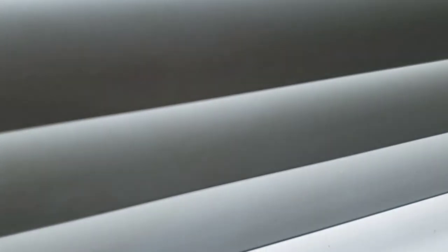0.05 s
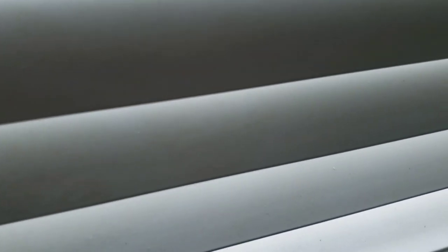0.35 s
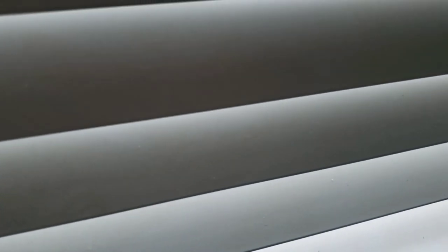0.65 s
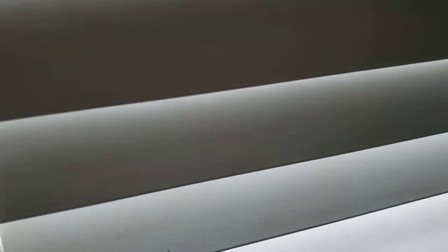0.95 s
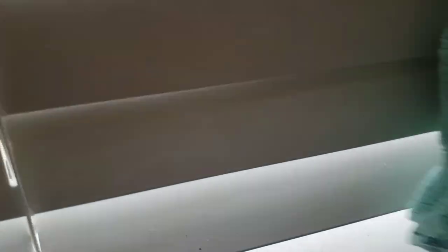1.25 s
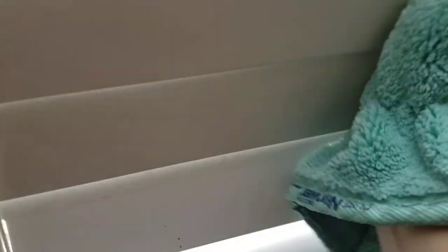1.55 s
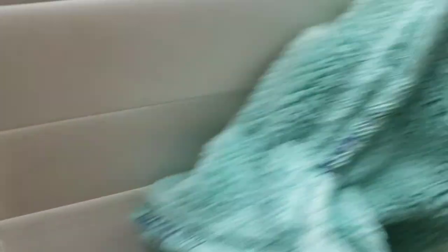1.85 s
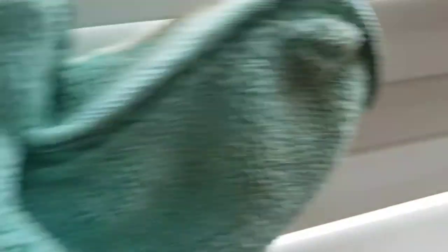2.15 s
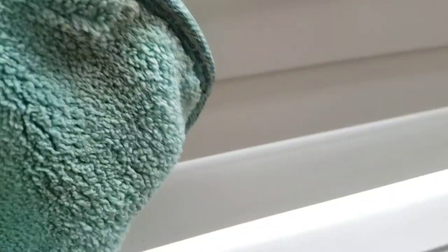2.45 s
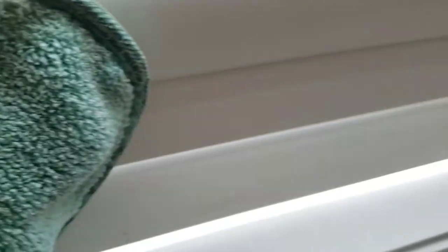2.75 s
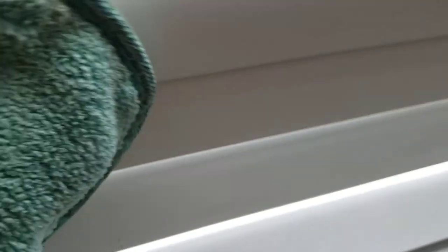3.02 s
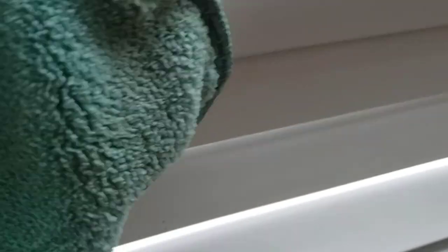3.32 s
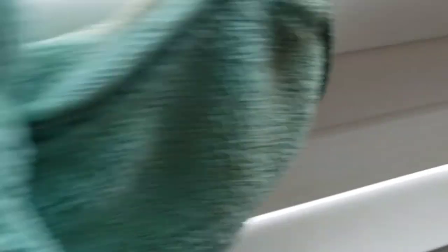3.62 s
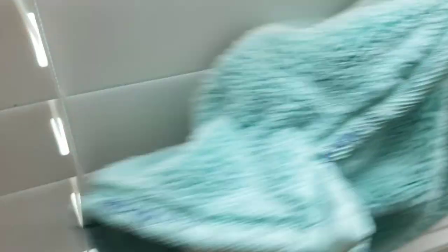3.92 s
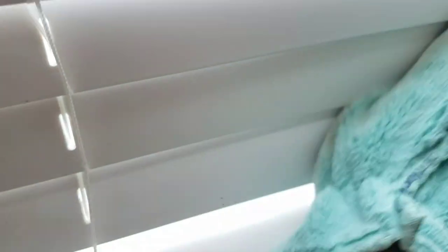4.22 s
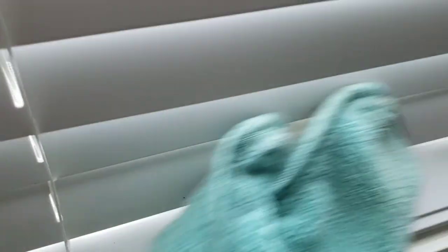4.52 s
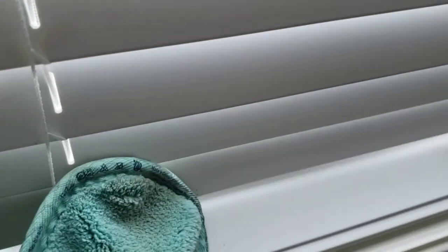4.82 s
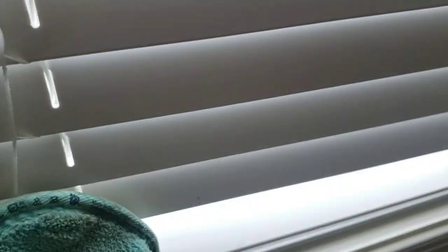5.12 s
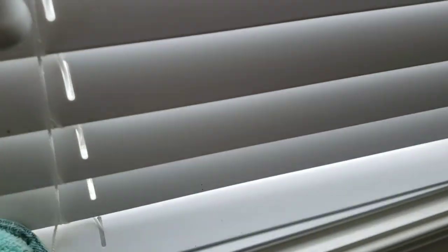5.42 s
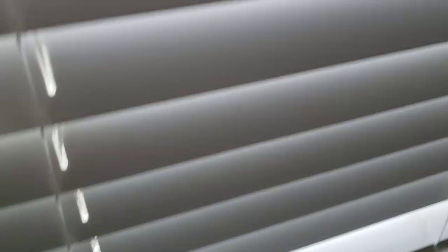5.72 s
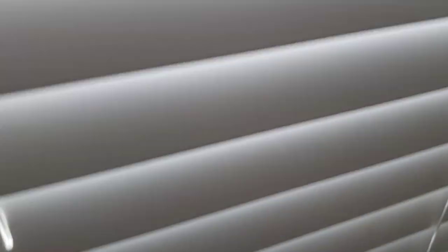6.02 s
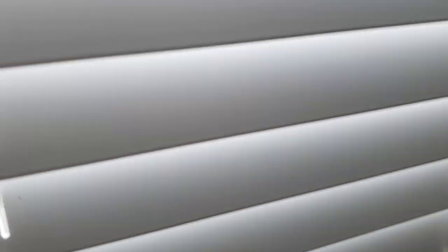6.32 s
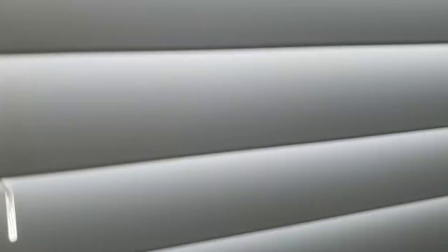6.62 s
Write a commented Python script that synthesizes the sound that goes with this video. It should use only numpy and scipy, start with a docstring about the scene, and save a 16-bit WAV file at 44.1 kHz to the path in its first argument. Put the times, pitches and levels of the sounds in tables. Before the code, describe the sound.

A cloth mitt swishes along window blinds close by, with dull knocks and sharp clacks as the slats bump together.

```python
"""A faint hiss and a low handling rumble, then a microfiber mitt swishes to and fro along window blinds.
Its pile slides and catches on the slats, which rasp, sing and shudder. The hand bumps the blind with
dull knocks; slat edges clack and tick against each other in a small room. The hand-held camera close
by adds two soft pops early on and a fingertip tap at the end."""
import sys
import numpy as np
from scipy import signal
from scipy.fft import rfft, irfft, next_fast_len
from scipy.io import wavfile
from scipy.ndimage import uniform_filter1d

SR = 44100
rng = np.random.default_rng(int(sys.argv[2]) if len(sys.argv) > 2 else 0)


def to_wav(s):
    """Save 16-bit WAV."""
    ch = np.atleast_2d(s).T  # columns
    pcm = np.round(np.clip(ch, -1, 1) * 32767)  # PCM
    wavfile.write(sys.argv[1], SR, pcm.astype(np.int16))


N = 298557
RIGHT_LAG_S = .0003  # between the two microphone ports


def amp(db):
    """Decibels to gain."""
    return 10 ** (np.asarray(db) / 20)


def unit(x):
    """Scales to rms 1."""
    return x / np.sqrt(np.mean(x ** 2) + 1e-20)


def read(points, hz):
    """Interpolates a curve over log frequency."""
    freq_hz, value = np.transpose(points)
    return np.interp(np.log(hz + 1), np.log(freq_hz + 1), value)


def sides(db):
    """Left and right gains for a level difference."""
    half_db = np.atleast_1d(db) / 2
    pair = np.array([amp(half_db), amp(-half_db)])
    return pair / np.sqrt(np.mean(pair ** 2, axis=0))


def add(mix, start_s, sound):
    """Mixes a sound in at start_s."""
    part = mix[:, max(round(start_s * SR), 0):][:, :sound.shape[1]]
    part += sound[:, :part.shape[1]]


def fft_grid():
    """Bin frequencies and size of an FFT that holds the whole scene."""
    size = 2 * next_fast_len(N // 2 + 1, True)
    return np.fft.rfftfreq(size, 1 / SR), size


def wander(rate_hz):
    """Smooth random drift, rms 1."""
    hz, size = fft_grid()
    return unit(irfft(rfft(rng.standard_normal(size)) / (1 + (hz / rate_hz) ** 4))[:N])


def resonance(hz, width_hz, count):
    """Stereo noise in one narrow resonance, rms 1."""
    offset = (np.fft.rfftfreq(count, 1 / SR) - hz) / width_hz
    return unit(irfft(rfft(rng.standard_normal((2, count))) / (1 + offset ** 2), count))


def swell(length_s):
    """One smooth rise and fall."""
    return signal.windows.hann(round(max(length_s, .005) * SR))[None]


def swells(rows):
    """Gain over time for a table of swells."""
    gain = np.zeros((1, N))
    for centre_s, length_s, level_db in rows:
        add(gain, centre_s - length_s / 2, amp(level_db) * swell(length_s))
    return gain


# Likeness of the ports: freq_hz, coherence
PORT_COHERENCE = [(60, 0.8), (160, 0.97), (350, 0.97), (640, 0.346), (1400, 0.36), (3000, 0.13),
                  (15000, 0.033)]
def ports(a, b, hz):
    """Two unrelated spectra become a partly alike pair, the right one late."""
    same = np.clip(read(PORT_COHERENCE, hz), -1, 1)
    delay = np.exp(-2j * np.pi * hz * RIGHT_LAG_S)
    return np.array([a, same * a * delay + np.sqrt(1 - same ** 2) * b])


# Balance of the ports: freq_hz, left_minus_right_db
PORT_BALANCE = [(100, 5), (400, 3), (800, 3.5), (1300, 5), (2400, 8.5), (4400, 13.5), (8000, 5.5),
                (12000, -5), (15000, -3)]
def colour(drive, spectrum):
    """Gives a noise pair a spectrum and the ports' stereo image; its mid has rms 1."""
    hz, size = fft_grid()
    shaped = ports(*rfft(drive, size), hz) * amp(read(spectrum, hz))
    pair = irfft(shaped * sides(read(PORT_BALANCE, hz)))[:, :N]
    return pair / np.std(pair.mean(axis=0))


# Room tone: freq_hz, density_db
AIR_SPECTRUM = [(25, -0.5), (95, -5), (170, -9.5), (260, -11.5), (470, -16), (650, -24), (1350, -28),
                (1750, -15), (2050, -8), (2600, -27.5), (3400, -18.5), (4500, -30), (6500, -42.5),
                (8700, -48), (12000, -30), (16000, -31.5)]
def still_air():
    """The steady noise floor of the room."""
    return amp(-72) * colour(rng.standard_normal((2, N)), AIR_SPECTRUM)


# Left port hiss: freq_hz, density_db
HISS_SPECTRUM = [(300, 1), (600, 4), (1100, 4), (1900, -2), (3000, -3), (5000, -4.5), (7000, -16),
                 (8700, -26), (10500, -7), (12500, -1.5), (16000, -2.5)]
def left_hiss(level_db=-66.5, fade_s=.018):
    """A thin hiss on the left, dying away at the first pop."""
    hz, size = fft_grid()
    hiss = unit(irfft(rfft(rng.standard_normal(size)) * amp(read(HISS_SPECTRUM, hz)))[:N])
    since_pop_s = np.maximum(np.arange(N) / SR - PORT_POPS[0][0], 0)
    hiss *= amp(level_db) * np.exp(-since_pop_s / fade_s)
    return np.array([hiss, np.zeros(N)])


# Handling noise: freq_hz, density_db
RUMBLE_SPECTRUM = [(20, -13.5), (40, -0.5), (60, 7), (100, 1), (150, -2), (250, -20), (600, -58.5)]
# Shifts of grip: centre_s, length_s, level_db
GRIP_SHIFTS = [(.87, 0.23, -54.5), (1.35, 0.18, -51.5), (2.33, 0.44, -53.5), (5.53, 0.38, -56.5)]
def grip_rumble(shake_db):
    """The hand on the camera rumbles, more with the work and with each shift of grip."""
    rumble = colour(rng.standard_normal((2, N)), RUMBLE_SPECTRUM)
    holding = amp(-52 + .15 * shake_db + 2 * wander(rate_hz=8.2))
    return rumble * np.hypot(holding, swells(GRIP_SHIFTS))


# Finger on the port: start_s, level_db
PORT_POPS = [(0.5377, -32), (0.572, -42.5)]
# Camera case modes: freq_hz, level_db, t60_s
CASE_MODES = [(2220, -43.5, 0.042), (12980, -40, 0.029)]
def finger_touches(pop_decay_s=.005, pop_cut_hz=2200, tap_s=6.7094):
    """A finger closes the left port with dull pops; later a tap rings the case."""
    out = np.zeros((2, N))
    t = np.arange(SR // 20) / SR
    pulse = (t / pop_decay_s - 1) * np.exp(-t / pop_decay_s)
    pop = signal.lfilter(*signal.butter(1, pop_cut_hz, fs=SR), pulse)
    for start_s, level_db in PORT_POPS:
        add(out[:1], start_s, amp(level_db) * pop[None])
    for hz, level_db, t60_s in CASE_MODES:
        ring = amp(level_db - 60 * t / t60_s) * resonance(hz, .067 * hz, len(t))
        add(out, tap_s, ring * sides(read(PORT_BALANCE, hz)))
    return out


# Reverberation: freq_hz, t60_s
ROOM_DECAY = [(150, 0.44), (400, 0.3), (1000, 0.57), (3000, 0.16), (12000, 0.35)]
def room(x, echoes_per_s=3000, gap_s=.005):
    """A small room: sparse reflections of random sign, each band dying at its own rate."""
    taps = rng.choice([-1., 1.], (2, SR)) * (rng.random((2, SR)) < echoes_per_s / SR)
    taps[:, :round(gap_s * SR)] = 0
    hz, t, spectra = signal.stft(taps, SR, nperseg=256)
    decay = amp(-60 * t / read(ROOM_DECAY, hz)[:, None])
    tail = signal.istft(ports(*spectra, hz[:, None]) * decay, SR, nperseg=256)[1]
    return signal.fftconvolve(x, tail / np.linalg.norm(tail[0]), axes=1)[:, :N]


def shake_level(push, build_s=.0057, t60_s=.58, knock_db=-27.5, clack_db=-11):
    """Shaking of the slats in dB: the mitt, knocks and clacks feed it, and it settles."""
    t = np.arange(SR) / SR
    settle = (amp(-60 * t / t60_s) * (1 - np.exp(-t / build_s))) ** 2
    power = abs(signal.fftconvolve(push ** 2, settle / settle.sum()))[None, :N]
    for start_s, level_db, *_ in HAND_KNOCKS:
        add(power, start_s, amp(level_db + knock_db) ** 2 * settle[None])
    for start_s, level_db, *_, rattle_db in SLAT_CLACKS:
        add(power, start_s, amp(level_db + rattle_db + clack_db) ** 2 * settle[None])
    return 10 * np.log10(power[0] + 1e-10)


# Flexing slats: freq_hz, density_db
FLEX_SPECTRUM = [(90, -12), (150, -10.5), (205, 5), (232, -5), (300, 2.5), (345, 0), (390, 3), (460, -6),
                 (620, -19.5), (1200, -47.5)]
# Dragged slats: centre_s, length_s, level_db
SLAT_DRONES = [(0.652, 0.17, -64), (1.05, 0.3, -55.5), (1.76, 0.45, -62), (2.28, .5, -63), (3.3, .3, -56.5),
               (3.723, 0.35, -56), (4.253, 0.44, -49), (5.12, 0.68, -57), (5.577, 0.64, -63.5),
               (6.44, 0.53, -64)]
def shudder(shake_db, drone_hz=168, width_hz=20):
    """Small uneven tugs keep the slats flexing, over a drone at their lowest bending mode."""
    tugs = friction(slips_per_s=240, spread_db=-1, slip_share=.23)
    flex = colour(tugs, FLEX_SPECTRUM) * amp(shake_db - 2)
    drone = resonance(drone_hz, width_hz, N) * swells(SLAT_DRONES)
    return flex + drone * sides(2.5)


# Jostling slats: freq_hz, density_db
RATTLE_SPECTRUM = [(130, -7.5), (200, 2.5), (290, -1.5), (400, 3), (480, -4), (560, 0), (680, -3),
                   (780, -15), (1500, -20), (3000, -30), (8000, -58)]
def rattle(t60_s=.35, rise_s=.001):
    """After a clack the neighbouring slats jostle on, hollow and fading."""
    power = np.zeros((1, N))
    t = np.arange(SR // 2)[None] / SR
    envelope = amp(-60 * t / t60_s) * (1 - np.exp(-t / rise_s))
    for start_s, level_db, *_, rattle_db in SLAT_CLACKS:
        add(power, start_s, (amp(level_db + rattle_db) * envelope) ** 2)
    return colour(rng.standard_normal((2, N)), RATTLE_SPECTRUM) * np.sqrt(power) * amp(-2)


# Modes of the whole blind: freq_hz, level_db, t60_s
BLIND_MODES = [(154.8, -25.5, 0.13), (207, -17, 0.18), (267.4, -21.5, 0.1), (292, -20, 0.26),
               (353, -23.5, 0.13), (420, -25, 0.039)]
def knock(level_db, pitch_hz, heave_db, swell_s=.003, heave_hz=193, heave_s=.0055):
    """A padded push briefly bends a slat over a slower heave; the blind rings on faintly."""
    t = np.maximum(np.arange(SR // 3) / SR - np.array([[0], [RIGHT_LAG_S]]), 0)

    def pulse(hz, peak_s):
        return (t / peak_s * np.exp(1 - t / peak_s)) ** 2 * np.sin(2 * np.pi * hz * t)

    bend = pulse(pitch_hz, swell_s)
    heave = amp(heave_db) * pulse(heave_hz, heave_s)
    ring = sum(amp(db - 60 * t / t60_s) * np.sin(2 * np.pi * hz * t) for hz, db, t60_s in BLIND_MODES)
    ring *= 1 - np.exp(-(t / swell_s) ** 2)
    return -amp(level_db + 1.26) * (bend + heave + ring) * sides(4.7)


# Hand on blind: start_s, level_db, pitch_hz, heave_rel_db
HAND_KNOCKS = [(.978, -39.5, 326, -22), (1.009, -40.5, 338, -10), (1.664, -24, 356, -6),
               (1.842, -38, 357, -12), (2.457, -42, 298, -16), (3.307, -27.5, 330, -14),
               (3.331, -24, 290, -2.5), (3.64, -38, 370, -7), (4.414, -12.5, 279, -22),
               (4.431, -6.5, 349, -25), (4.523, -21, 322, -17), (4.554, -15.5, 360, -14),
               (4.736, -25.5, 327, -17), (4.791, -29.5, 366, -9), (4.817, -24, 364, -12.5),
               (4.879, -33.5, 384, -14), (4.938, -40, 335, -18), (5.07, -29.5, 350, -4),
               (5.118, -36.5, 377, -12)]
def hand_knocks(low_cut_hz=136):
    """The hand bumps the blind; below the cut, air slips round the narrow slats and little radiates."""
    out = np.zeros((2, N))
    for start_s, *hit in HAND_KNOCKS:
        add(out, start_s, knock(*hit))
    return signal.sosfilt(signal.butter(1, low_cut_hz, "high", fs=SR, output="sos"), out)


# Modes of one slat: freq_hz, level_db, t60_s
SLAT_MODES = [(513, -5, 0.021), (738, 4.5, 0.029), (795, -4, .02), (1100, -5, 0.018), (1380, 2.5, 0.011),
              (1592, -3.5, 0.037), (1838, 0.5, 0.04), (2130, -4, 0.042), (2570, -7.5, 0.025),
              (2970, 1, 0.0045), (3570, -13.5, 0.016)]
# Edge crack: freq_hz, density_db
EDGE_SPECTRUM = [(1200, -22.5), (2500, 8.5), (3500, -1.5), (5200, 5.5), (7000, -6.5), (8700, -7.5),
                 (11000, -5), (13000, 0), (16000, -4.5)]
def clack(level_db, hollow_db, edge_db, pan_db, ring_scale, crack_t60_s=.025, contact_s=.00025):
    """Two slats meet: their modes ring briefly, differently at each spot, and the edges crack."""
    count = SR // 8
    lag_s = RIGHT_LAG_S * np.clip((pan_db - 1.5) / 4, 0, 1)  # none from straight ahead
    t = np.maximum(np.arange(count) / SR - np.array([[0], [lag_s]]), 0)
    age = t / max(ring_scale, .2)
    hollow, bright = np.zeros((2, 2, count))
    for hz, mode_db, t60_s in SLAT_MODES:
        pitch_hz = hz * (1 + .068 * rng.standard_normal())
        scatter_rad = .49 * (rng.standard_normal() + .5 * rng.standard_normal((2, 1)))
        phase = 2 * np.pi * pitch_hz * (t - .0009) + scatter_rad  # modes crest together after contact
        band = hollow if hz < 1100 else bright
        band += amp(mode_db - 60 * age / t60_s) * np.cos(phase)
    edge_gain = amp(read(EDGE_SPECTRUM, np.fft.rfftfreq(count, 1 / SR)))
    grit = irfft(rfft(rng.standard_normal(t.shape)) * edge_gain, count)
    crack = grit * amp(-60 * age / crack_t60_s)
    blow = unit(bright) + amp(hollow_db - 4) * unit(hollow) + amp(edge_db + .5) * unit(crack)
    return amp(level_db - 20.5) * blow * (1 - np.exp(-t / contact_s)) * sides(pan_db)


# Slat on slat: start_s, level_db, hollow_rel_db, edge_rel_db, pan_db, ring_scale, rattle_rel_db
SLAT_CLACKS = [(0.806,-29,-20,-15,5.5,0.97,-28), (0.8614,-39.5,-11,-21,6,1.5,-17),
               (1.156,-44.5,-11,-5,3,1.1,-12), (1.1784,-22.5,-14.5,-15.5,5.5,.45,-34),
               (1.6562,-33.5,-12,-6.5,6,.7,-11), (2.1253,-16.5,-2,-17,10.5,0.55,-22),
               (2.9569,-21.5,-17,-4.5,8,0.67,-28), (3.3088,-32.5,2,-13,-2.5,1.3,-3),
               (3.3302,-19,5.5,-11.5,6.5,.7,-7.5), (3.3384,-32,8,-20.5,-16,1,-15.5),
               (3.6026,-29.5,-18,5.5,5,0.4,-16), (3.6419,-22.5,0,-8.5,4,1.2,-10), (3.712,-25,-5,-5,6,3,-27),
               (3.792,-29.5,8,-9.5,3.5,0.32,-35), (3.8320,-33,13.5,-8,-1,0.44,-10),
               (3.8346,-30,10.5,-17,4,0.44,-6), (3.8582,-21.5,7.5,-36,4,0.3,-28),
               (4.1762,-24.5,-23,-23,9,0.5,-31), (4.3137,-22,-14,-0.5,11,0.64,-33),
               (4.341,-40,-14,-12,3.5,.9,-25.5), (4.4118,-28,1,4.5,6.5,0.61,-21),
               (4.4276,-24,8,-7.5,6.5,1,-16), (4.4504,-22.5,-3.5,-12,5,0.75,-21.5),
               (4.5555,-37.5,8.5,-24,15,1.8,-10), (4.9392,-36,-5,-4,12,.5,-32),
               (5.0755,-26,-23,-22,5,1.5,-37), (5.175,-30,-20,-5.5,6.5,2.6,-29),
               (5.351,-37.5,-21,-17,5,0.74,-36), (5.5253,-42,-23,-18.5,18,1,-44),
               (5.7059,-44,-4.5,-17.5,9,.8,-42), (6.7441,-43.5,-10,-4.5,2.5,1.6,-19.5)]
def slat_clacks():
    """Slat edges collide, from faint ticks to hollow clacks."""
    out = np.zeros((2, N))
    for start_s, *hit, _ in SLAT_CLACKS:
        add(out, start_s, clack(*hit))
    return out


# Quick passes of the mitt: centre_s, length_s, level_db
QUICK_PASSES = [(1.96, .4, -54.5), (3.288, .08, -45.5), (4.4, .08, -43.5)]
def whooshes(hollow_hz=3600, width_hz=520):
    """The gap between mitt and slat colours the swish of the quickest moves."""
    return resonance(hollow_hz, width_hz, N) * swells(QUICK_PASSES) * sides(9.5)


# Mitt catching on a slat: centre_s, length_s, sing_db, pitch_hz, rasp_db, shake_db
CATCHES = [(0.488, .07, -64.5, 1930, -81, -72), (0.698, 0.21, -65.5, 1910, -98, -70),
           (0.792, 0.11, -50.5, 1860, -65, -55), (1.355, .11, -52, 1800, -57, -53),
           (2.207, .15, -52, 1750, -51.5, -49), (2.374, 0.1, -52.5, 1750, -52, -45),
           (3.04, 0.23, -52.5, 1840, -65, -57), (3.283, 0.16, -48, 1760, -58, -56),
           (3.61, .089, -46, 1740, -51.5, -60), (3.71, .05, -41, 1750, -52, -35.5),
           (3.83, 0.08, -39, 1730, -41.5, -63), (4.098, .15, -39.5, 1910, -50, -48.5),
           (4.226, .11, -47.5, 1800, -64, -60), (4.741, 0.071, -44.5, 1690, -55, -37),
           (4.958, .13, -46.5, 1730, -58, -67), (5.056, 0.17, -55, 1760, -60, -55),
           (5.081, .022, -38.5, 1740, -46, -60), (5.186, .06, -47, 1700, -46, -63),
           (5.39, 0.071, -43, 1714, -49.5, -62), (5.527, 0.03, -53, 1880, -66, -72),
           (5.617, .09, -56, 1750, -60, -56), (6.125, .07, -83, 1905, -80.5, -70),
           (6.37, 0.072, -72.5, 1940, -95, -85)]
def singing_slats(width_hz=90):
    """Stick and slip drive a slat's mode for a moment."""
    out = np.zeros((2, N))
    for centre_s, length_s, sing_db, pitch_hz, *_ in CATCHES:
        envelope = amp(sing_db - 1.5) * swell(length_s)
        tone = resonance(pitch_hz, width_hz, envelope.size)
        add(out, centre_s - length_s / 2, envelope * tone * sides(7.2))
    return out


def linger(power, tail_db=-11, t60_s=.2):
    """Turns rubbing power into a gain, with the brief tail the room adds."""
    keep = amp(-60 / (t60_s * SR)) ** 2
    tail = signal.lfilter([1 - keep], [1, -keep], power)
    return np.sqrt(power + amp(tail_db) ** 2 * tail)


# Wipes: start_s, end_s, rise_s, fall_s, swish_db, growth_db,
# fizz_rel_db, fizz_growth_db, rasp_rel_db, shake_db, leftness
WIPES = [(.32, .6, .15, .07, -79.5, 4, -6, 0, -6, -71, 26),
         (0.671, 0.932, 0.075, 0.19, -59, 8, -1.5, 2, -13, -74, 9),
         (0.862, 1.613, 0.15, 0.27, -62.5, 13, -2.5, -1, -8, -60, 9),
         (1.496, 2.455, 0.16, 0.078, -54.5, 1, -1, 7.5, -8.5, -59.5, 12),
         (2.3, 2.99, .06, .05, -70.5, -3, -2.5, -4, -6.5, -79, 20),
         (2.503, 2.8, 0.087, 0.14, -64.5, 8, 2, -17, -18, -76, 21),
         (2.922, 3.235, 0.034, 0.17, -59.5, 0, -2, -2, -1.5, -62.5, 11),
         (3.155, 3.37, 0.17, 0.045, -53.5, 12, -9, 25, 2.5, -48, 10),
         (3.476, 4.272, 0.14, 0.12, -51, -1.5, 1, -0.5, -7, -54.5, 10),
         (4.167, 4.484, 0.1, 0.095, -46, 22, -2.5, -11, -7.5, -55, 5.5),
         (4.42, 4.905, .05, 0.15, -55.5, 5, 0, -7, -4.5, -68, 7.5),
         (4.819, 5.138, 0.2, 0.12, -53.5, -1, -5.5, -2, -10, -55, 7),
         (5.08, 5.505, 0.045, .1, -62, 2, -4, 19, -2, -63, 9),
         (5.415, 5.719, 0.059, 0.12, -62.5, 6, 1, 20, -5, -78, 10),
         (5.65, 5.992, .05, 0.22, -72.5, -9, -8, -4, -3, -90, 17),
         (5.902, 6.654, 0.086, 0.049, -87, -4, -7, 0.5, -8.5, -81.5, 11.5),
         (6.59, 6.816, 0.058, .03, -74.5, 25, -5, -4, -14.5, -91, 12)]
def stroke_gains(catch_swish_db=-10.5):
    """The mitt speeds up, glides, catches and slows: gains of swish, fizz, rasp and push on the slats."""
    swish, fizz, rasp = np.zeros((3, 2, N))  # summed as powers
    push = np.zeros((1, N))
    for (start_s, end_s, rise_s, fall_s, swish_db, growth_db,
         fizz_rel_db, fizz_growth_db, rasp_rel_db, shake_db, leftness) in WIPES:
        t = np.arange(start_s, end_s, 1 / SR)
        speed = np.sin(np.pi / 2 * np.clip((t - start_s) / rise_s, 0, 1))
        speed *= np.sin(np.pi / 2 * np.clip((end_s - t) / fall_s, 0, 1))
        along = (t - start_s) / (end_s - start_s) - .5
        level_db = swish_db + growth_db * along
        fizz_db = level_db + fizz_rel_db + fizz_growth_db * along
        pan = leftness - 10
        add(swish, start_s, (amp(level_db) * speed ** 1.94 * sides(.47 * pan)) ** 2)
        add(rasp, start_s, (amp(level_db + rasp_rel_db) * speed ** .9 * sides(.57 * pan)) ** 2)
        add(fizz, start_s, (amp(fizz_db) * speed ** 2.65 * sides(.27 * pan)) ** 2)
        add(push, start_s, (amp(shake_db) * speed[None]) ** 2)
    for centre_s, length_s, sing_db, _, rasp_db, shake_db in CATCHES:
        for power, level_db in (push, shake_db), (rasp, rasp_db), (swish, sing_db + catch_swish_db):
            add(power, centre_s - length_s / 2, (amp(level_db) * swell(length_s)) ** 2)
    return linger(swish), linger(fizz, tail_db=-15), linger(rasp), np.sqrt(push[0])


def friction(slips_per_s, spread_db, slip_share):
    """Countless fibres slide; single ones catch and snap free."""
    slips = rng.random(N) < slips_per_s / SR
    strength = amp(spread_db * np.minimum(rng.exponential(1, N), 3))
    sliding = rng.standard_normal((2, N))
    snaps = unit(slips * strength * rng.choice([-1, 1], (2, N)))
    return np.sqrt(1 - slip_share) * sliding + np.sqrt(slip_share) * snaps


def patchy(x, depth_db):
    """As the mitt travels, each spot on a slat favours other frequencies."""
    spectra = signal.stft(x, nperseg=512)[2]
    patches = rng.standard_normal(spectra.shape)
    for _ in range(2):
        patches = uniform_filter1d(patches, size=3, axis=1)  # over frequency
        patches = uniform_filter1d(patches, size=12, axis=2)  # over time
    return signal.istft(spectra * amp(depth_db * unit(patches)), nperseg=512)[1][:, :N]


# Sliding pile, fibre tips, pressed pile: freq_hz, density_db
SWISH_SPECTRUM = [(700, -22), (1300, -8), (1750, 3), (2100, -0.3), (2500, -4.5), (3400, -3), (4200, -7.5),
                  (4900, -6), (5800, -7.5), (7200, -18.5), (8600, -39), (12000, -47.5)]
FIZZ_SPECTRUM = [(4500, -28.5), (7200, -6.5), (8600, -12), (10200, -6.5), (12500, 1.5), (14500, -2.5),
                 (16000, -3.5)]
RASP_SPECTRUM = [(200, -42.5), (450, -9.5), (700, 0), (1200, 0.5), (1500, -1), (2200, -26)]
def mitt(swish_gain, fizz_gain, rasp_gain):
    """The pile swishes, its tips fizz and pressure adds a lower rasp; its grip comes and goes."""
    grip = wander(rate_hz=26)
    pile = patchy(friction(slips_per_s=730, spread_db=1, slip_share=.071), depth_db=1.73)
    tips = patchy(friction(slips_per_s=1500, spread_db=3, slip_share=.09), depth_db=2.9)
    pressed = patchy(friction(slips_per_s=300, spread_db=4, slip_share=.39), depth_db=3.5)
    swish = colour(pile, SWISH_SPECTRUM) * swish_gain * amp(1.47 + 1.2 * grip)
    fizz = colour(tips, FIZZ_SPECTRUM) * fizz_gain * amp(1.4 + 1.1 * grip)
    rasp = colour(pressed, RASP_SPECTRUM) * rasp_gain * amp(.44 + grip)
    return swish + fizz + rasp


def scene():
    """Wiping, knocks and clacks in the room, over handling noise and still air."""
    knocks, clacks = hand_knocks(), slat_clacks()
    air = still_air()
    swish_gain, fizz_gain, rasp_gain, push = stroke_gains()
    shake_db = shake_level(push)
    wiping = mitt(swish_gain, fizz_gain, rasp_gain) + singing_slats() + whooshes()
    shaking = shudder(shake_db) + rattle()
    reverb = room(amp(-14) * knocks + amp(-14.5) * clacks)
    handling = grip_rumble(shake_db) + finger_touches()
    return air + left_hiss() + handling + reverb + shaking + knocks + clacks + wiping


def record(dry, low_cut_hz=38, high_cut_hz=16000):
    """The microphone's bass roll-off and a treble band limit."""
    thin = signal.sosfilt(signal.butter(3, low_cut_hz, "high", fs=SR, output="sos"), dry)
    lowpass = signal.firwin(511, high_cut_hz, window=("kaiser", 9), fs=SR)
    return signal.oaconvolve(thin, lowpass[None], "same")


dry = scene()
out = record(dry)
to_wav(out)
```